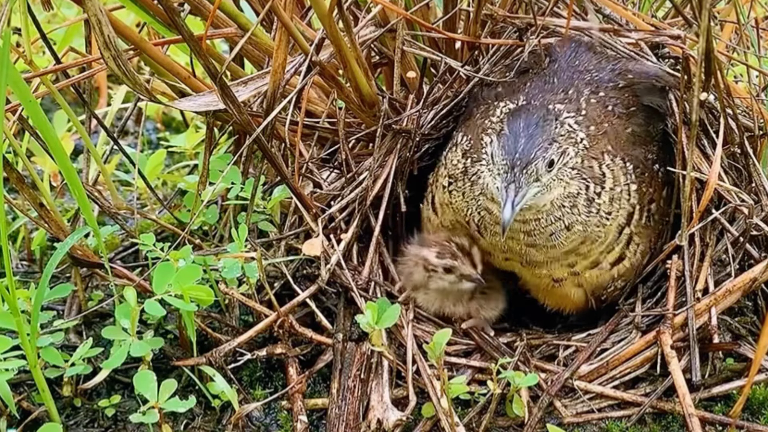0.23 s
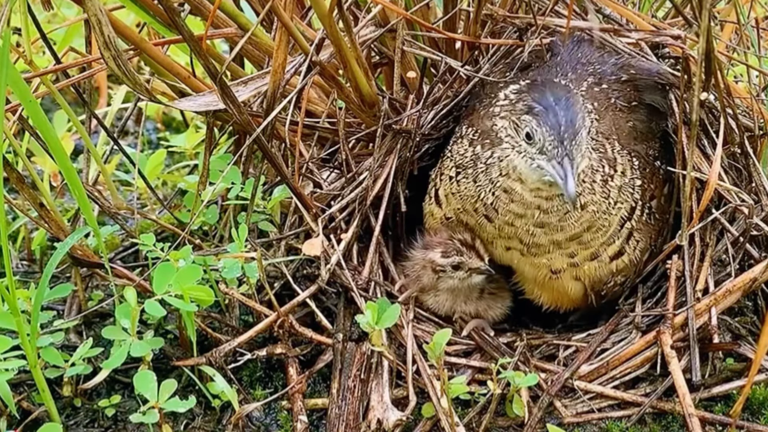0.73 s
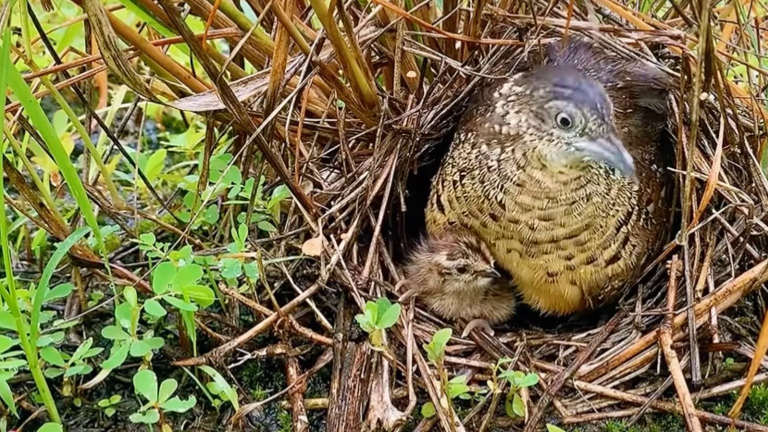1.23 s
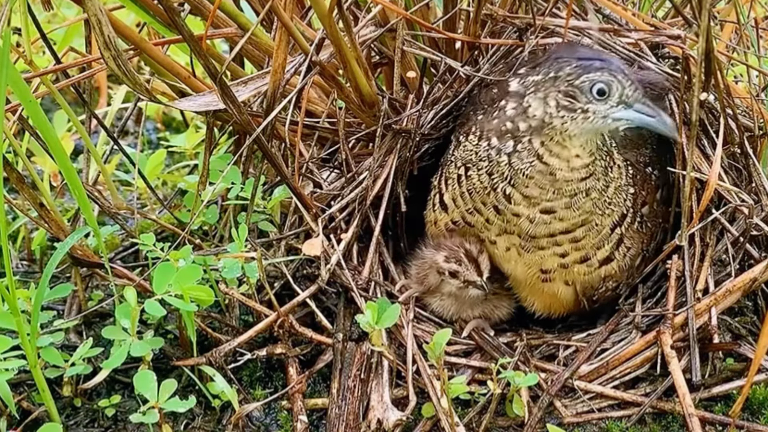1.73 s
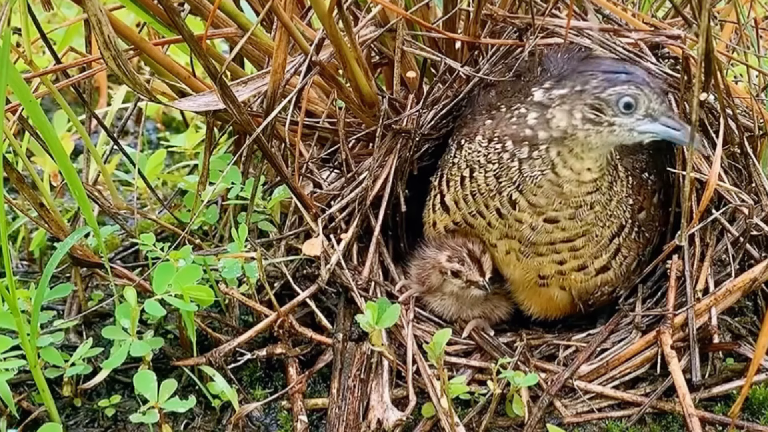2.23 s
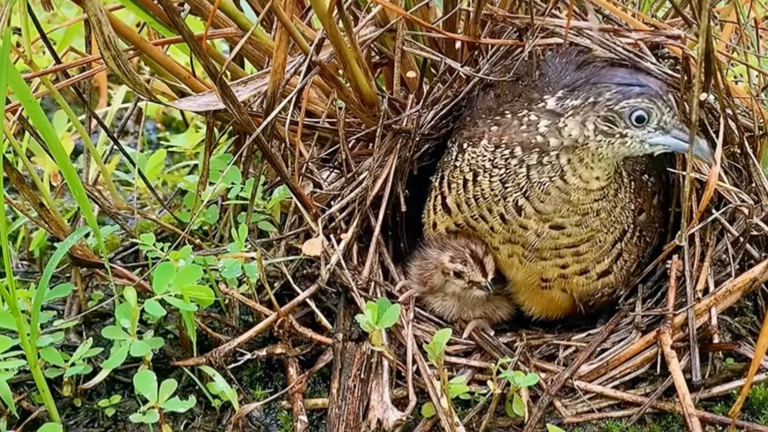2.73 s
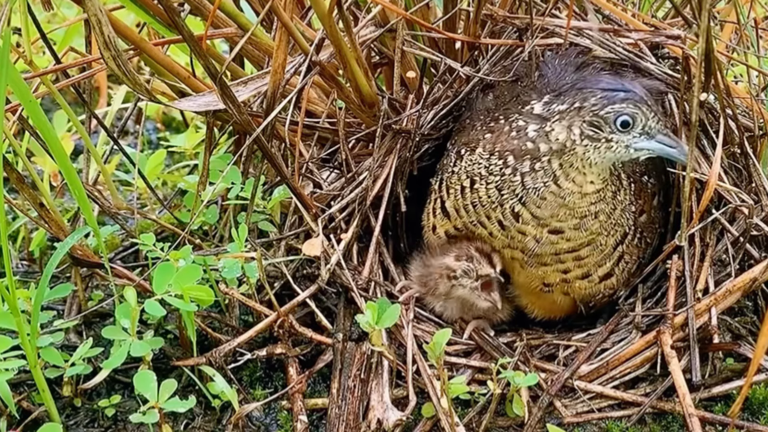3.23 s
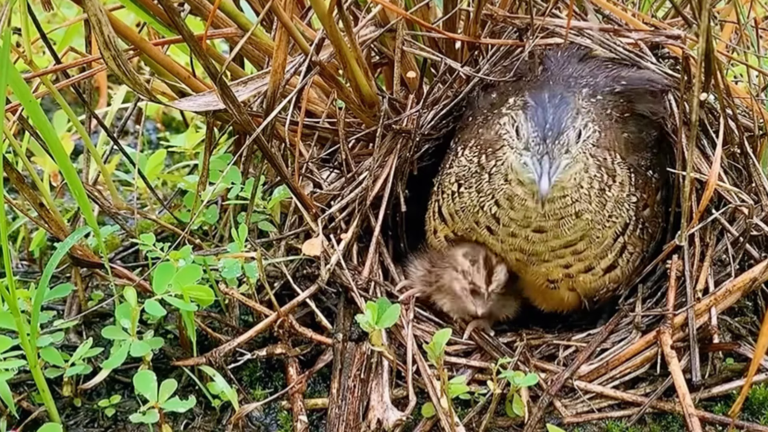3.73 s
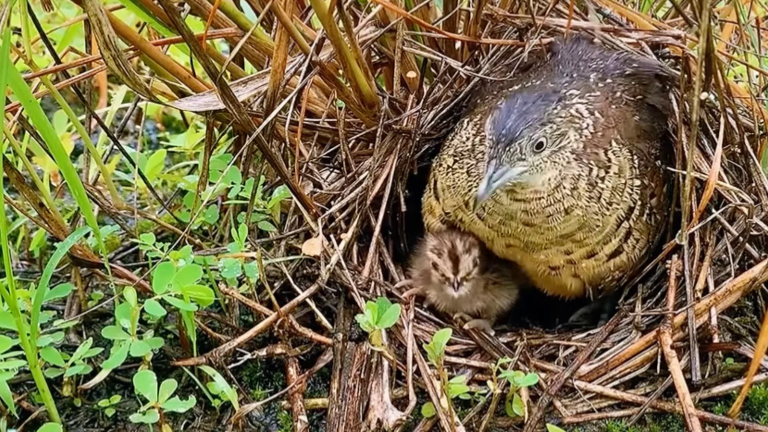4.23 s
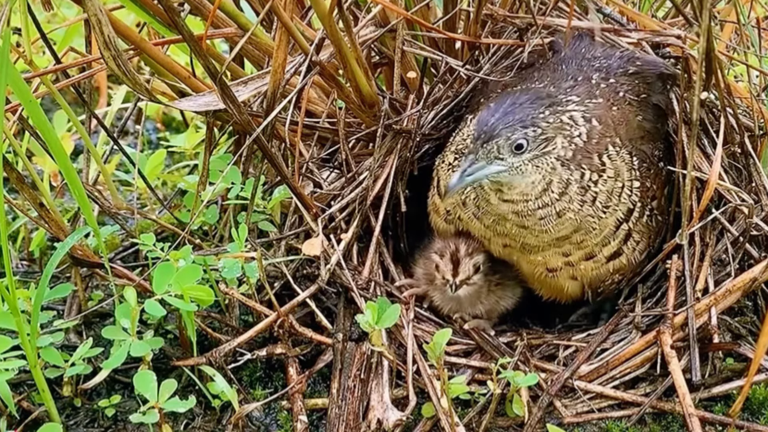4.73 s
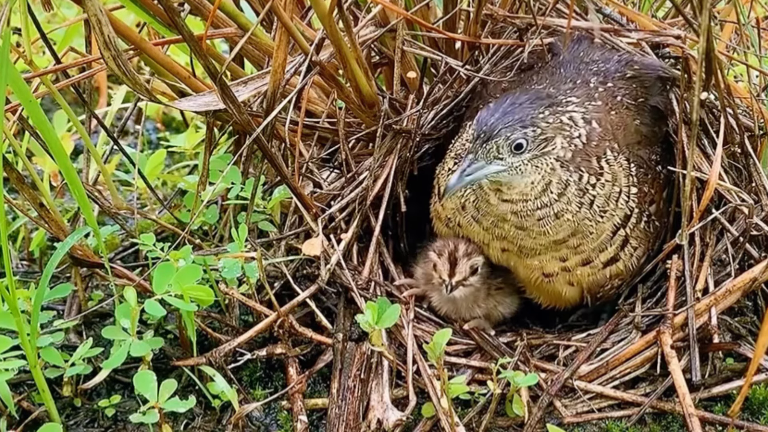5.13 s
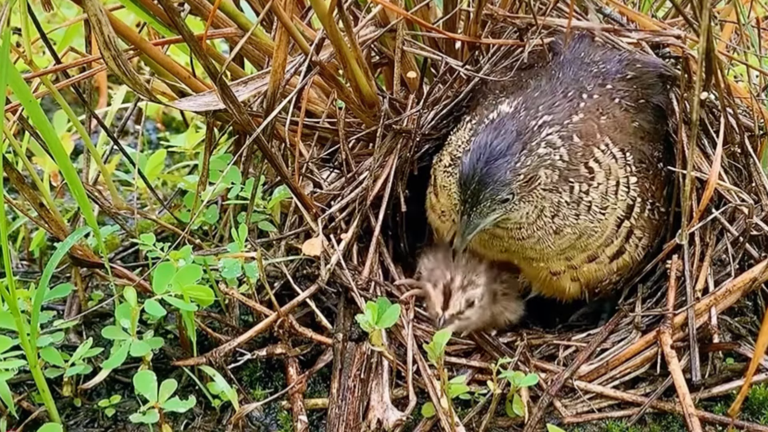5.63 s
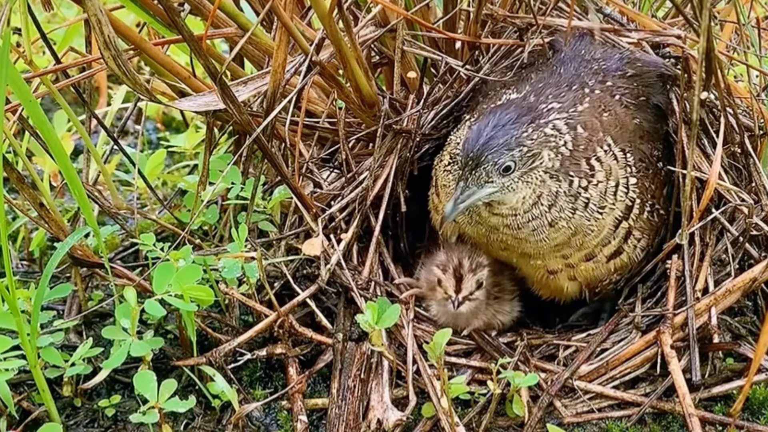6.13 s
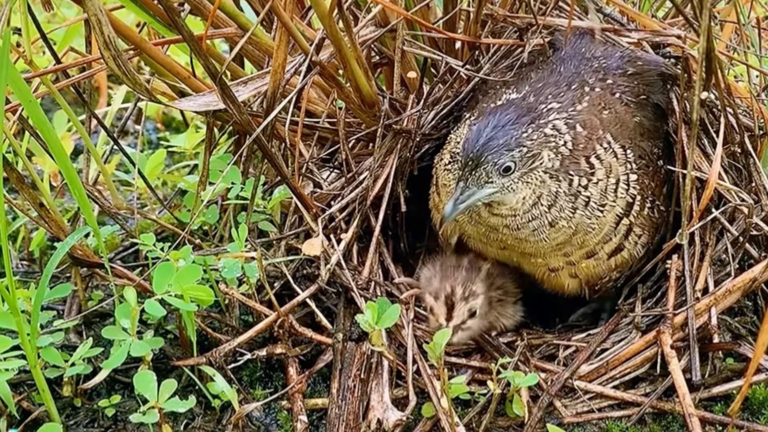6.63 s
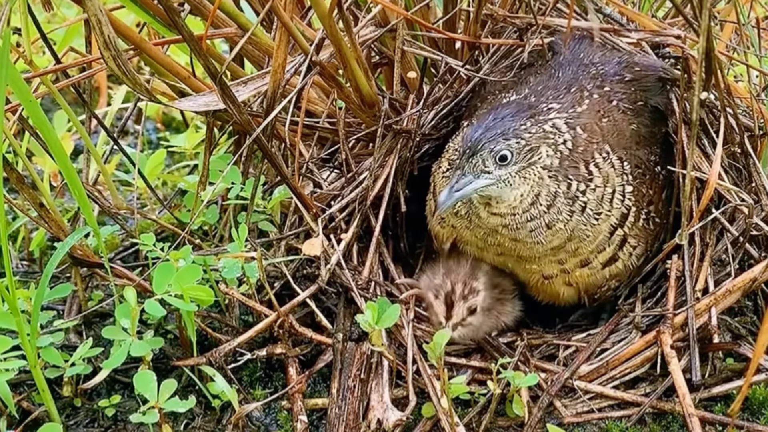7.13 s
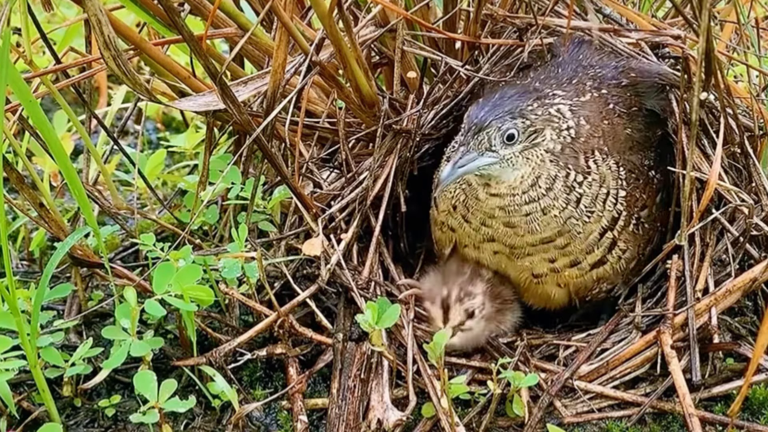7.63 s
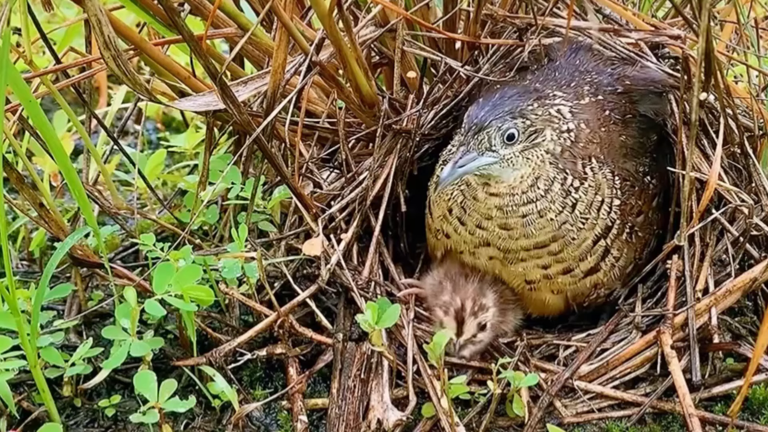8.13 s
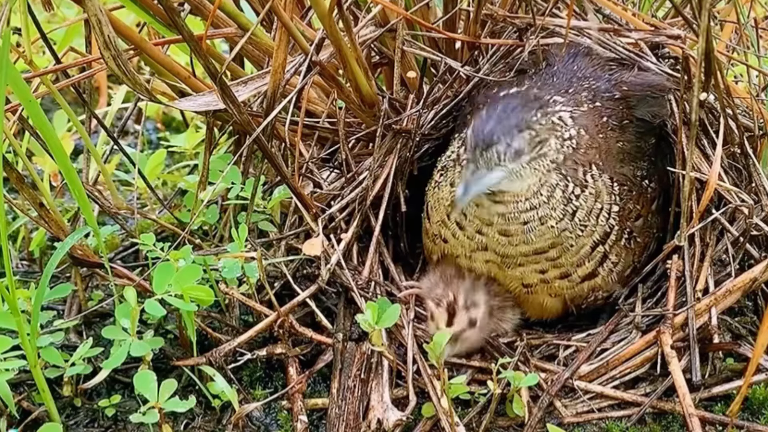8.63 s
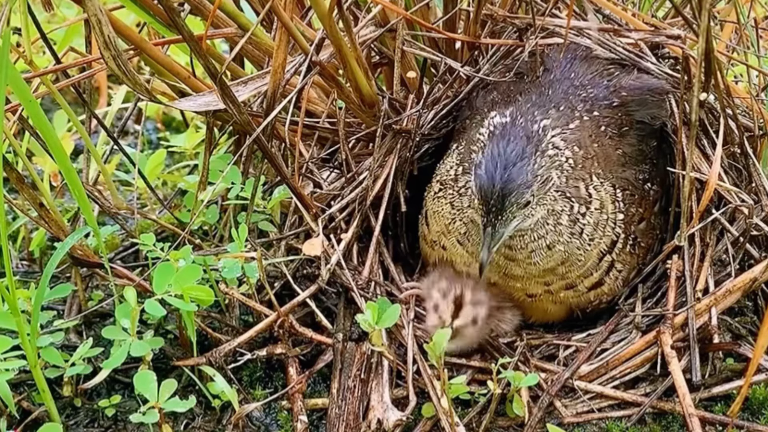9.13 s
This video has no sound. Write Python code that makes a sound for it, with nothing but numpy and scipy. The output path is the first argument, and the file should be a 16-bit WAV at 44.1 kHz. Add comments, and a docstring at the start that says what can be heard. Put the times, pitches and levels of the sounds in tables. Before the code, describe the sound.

A close stereo microphone low in wet grass picks up a dense wash of rain and fine hissing spray. Individual drops stand out: hollow plops, bright snaps on straw, knocks on earth. A far-off motor-like drone with a faint hum wavers, climbs and falters before stopping dead. Afterwards the background is quieter and thinner, while irregular near drops go on to the end.

```python
"""Rain around a ground nest

Steady rain on grass and leaves, heard from close by: filtered noise and impacts make a wash and fine spray.
Near drops are short rings and noise bursts: plops on leaves, ticks and cracks on dry straw, splats, thuds.
A low two-partial rumble, like an engine some way off, runs underneath with a faint hum and thin whines.
The rumble stops abruptly; the wash, spray and small drops are softer from then on."""
import sys
import numpy as np
from scipy import signal
from scipy.fft import rfft, irfft
from scipy.io import wavfile
from scipy.ndimage import uniform_filter1d

SR = 44100
rng = np.random.default_rng(int(sys.argv[2]) if len(sys.argv) > 2 else 0)


def output_pcm(signal):
    """Save a mono or channel-first signal as 16-bit PCM at the path in sys.argv[1].

    Samples are clipped to [-1, 1] before scaling.
    """
    pcm = np.clip(np.atleast_2d(signal).T, -1, 1) * 32767
    wavfile.write(sys.argv[1], SR, np.round(pcm).astype(np.int16))


N = 413658
TIME = np.arange(N) / SR


def undb(db):
    """Decibels to gain."""
    return 10 ** (np.asarray(db) / 20)


def unit(x):
    """Scale to rms 1."""
    return x / np.sqrt(np.mean(x ** 2))


def curve(rows):
    """A (s, value) table, joined by straight lines sample by sample."""
    return np.interp(TIME, *np.transpose(rows))


def per_bin(points):
    """A (Hz, value) table on the frequency bins, joined on a log axis."""
    hz, value = np.transpose(points)
    bin_hz = np.arange(N // 2 + 1) * SR / N
    return np.interp(np.log(bin_hz + 1), np.log(hz), value)


def shape(x, gain):
    """Filter by a gain per frequency bin."""
    return irfft(rfft(x) * gain, N)


def band(x, low_hz, high_hz):
    """Gentle causal band-pass."""
    edges = [low_hz, min(high_hz, SR / 2 - 1000)]
    return signal.sosfilt(signal.butter(2, edges, "band", fs=SR, output="sos"), x)


def walk(rate):
    """Slow random wander of rms 1: rate random values a second, joined smoothly."""
    step = int(SR / rate)
    held = np.repeat(rng.standard_normal(N // step + 1), step)
    return unit(uniform_filter1d(held, step)[:N])


def add(out, s, sound, pan_db=0, lag=0):
    """Mix a sound in at time s, left minus right pan_db; the left side hears it lag seconds later."""
    side_sum = np.cosh(pan_db * np.log(10) / 40)  # keeps the sum of both gains constant
    for side, sign in zip(out, (1, -1)):
        i = int(np.clip((s + sign * lag / 2) * SR, 0, N - 1))
        side[i:i + len(sound)] += sound[:N - i] * undb(sign * pan_db / 2) / side_sum


def ring(hz, cycles, sag, sag_s, rise):
    """A struck surface swells over rise cycles, falls 60 dB in cycles; its pitch sags as the drop spreads."""
    t = TIME[:SR // 10]
    pitch = hz * (1 + sag * (np.exp(-t / sag_s) - 1 / 2))
    swell = undb(-60 * t * hz / cycles) * (1 - np.exp(-t * hz / rise))
    return np.sin(2 * np.pi * np.cumsum(pitch) / SR) * swell / swell.max()


def splash(low_hz, high_hz, decay_s):
    """A short burst of scattered water: decaying noise through a band-pass, peak 1."""
    t = TIME[:SR // 10]
    burst = band(rng.standard_normal(len(t)) * np.exp(-t / decay_s), low_hz, high_hz)
    return burst / np.abs(burst).max()


HUM_HZ = 197.4


def hum(drift, waver_db):
    """A faint hum: one sine whose phase drifts (radians) and whose level wavers."""
    tone = np.sin(2 * np.pi * HUM_HZ * TIME + drift * walk(7))
    return unit(tone * undb(waver_db * walk(8.7)))


# faint thin tones in the treble, level ahead of the shower's strength: pitch_hz, level_db
WHINES = [(2966, -53), (3190, -49.5), (3849, -52), (4350, -55), (4560, -52.5)]


def whines(flutter_per_s):
    """Narrow tones that flutter in level and phase, differently on each side."""
    out = np.zeros((2, N))
    for side in out:
        for hz, db in WHINES:
            phase = 2 * np.pi * hz * TIME
            side += undb(db) * (walk(flutter_per_s) * np.sin(phase) + walk(flutter_per_s) * np.cos(phase))
    return out


# level at idle, and what load adds over a span of pitch above it
IDLE_HZ, IDLE_DB = 54.1, -28
LOAD_SPAN_HZ, LOAD_DB = 1.6, 6
PULL_DB_PER_HZ_PER_S = 0.3155  # added while the pitch climbs
BOOM_HZ, BOOM_WIDTH_HZ = 152, 5.7  # a resonance that the rumble excites
FALTER_DB, FALTER_S = 7, .04  # depth, and time either side of the middle to 1/e of that depth
# speed of the rumble: time_s, pitch_hz
RUMBLE = [(0, 51.5), (0.6, 52.3), (1.15, 56), (1.4, 50.7), (1.7, 52), (2.05, 48.1), (2.45, 50.85),
          (2.75, 50), (3.3, 51.16), (3.8, 53.6), (4.0, 56.36), (4.5, 64.1), (4.85, 66.44), (5.42, 60.8)]
# middles of the moments when the rumble falters: time_s
FALTERS = [.46, 4.36, 4.67, 4.88, 5.24, 5.35]


def rumble(third_db, waver_db):
    """An unsteady drone, louder under load and while speeding up; its third harmonic meets a resonance."""
    hz = curve(RUMBLE)
    load = np.clip((hz - IDLE_HZ) / LOAD_SPAN_HZ, 0, 1)
    speeding_up = uniform_filter1d(np.maximum(np.gradient(hz) * SR, 0), size=SR // 10)
    falter = sum(np.exp(-((TIME - s) / FALTER_S) ** 2) for s in FALTERS)
    db = IDLE_DB + LOAD_DB * load + PULL_DB_PER_HZ_PER_S * speeding_up - FALTER_DB * falter
    phase = 2 * np.pi * np.cumsum(hz) / SR + 0.15 * walk(7.2)
    resonance = 1 / np.hypot(1, (3 * hz - BOOM_HZ) / (BOOM_WIDTH_HZ / 2))
    drone = np.sin(phase) + undb(third_db) * resonance * np.sin(3 * phase)
    return unit(drone) * undb(db + waver_db * walk(19))


def patter(rate, spread_db, smooth):
    """Countless impacts of uneven size; the farthest merge into smooth noise."""
    hit = rng.random(N) < rate / SR
    size = undb(spread_db * np.minimum(rng.exponential(size=N), 4))
    impacts = unit(hit * size * rng.choice([-1, 1], N))
    return unit(impacts + smooth * rng.standard_normal(N))


# tone of the far drops while the rumble runs, and after it: freq_hz, relative_level_db
LOUD_WASH = [(22, -50), (52, 2), (90, -1.5), (130, -2), (260, -5), (430, -8), (850, -12.5), (1400, -14),
             (2000, -19), (4300, -21), (5400, -25), (7000, -22.5), (9000, -63)]
SOFT_WASH = [(22, -50), (50, 2), (130, -4.5), (180, -1), (260, -6.5), (380, -6), (850, -14), (1400, -18.5),
             (2100, -22), (3200, -20.5), (4500, -20), (5400, -27), (7000, -22), (9000, -86)]
# power common to left and right, while the rumble runs and after it: freq_hz, share (0-1)
LOUD_LIKENESS = [(130, 1), (290, 0.98), (640, 0.27), (1400, 0), (2500, 0.08)]
SOFT_LIKENESS = [(130, 0.011), (290, 0.21), (640, 0.39), (1400, 0.096), (2500, 0.07)]
# lean of the wash, left minus right: freq_hz, pan_db
LEAN = [(200, .3), (700, 2), (1500, 2.5), (2600, 2), (4000, -1), (5300, -2.5), (7000, 0)]


def wash(spectrum, likeness, db, flicker_db):
    """Far rain: flickering patter, partly common to both sides, partly each side's own."""
    common, left, right = (patter(rate=900, spread_db=3.0, smooth=1.0) * undb(flicker_db * np.tanh(walk(35)))
                           for _ in range(3))
    share = np.clip(per_bin(likeness), 0, 1)
    both = shape(common, np.sqrt(share)) + shape(np.array([left, right]), np.sqrt(1 - share))
    tone_db = per_bin(spectrum) + np.outer([1, -1], per_bin(LEAN)) / 2
    return undb(db) * unit(shape(both, undb(tone_db)))


def fizz(rate, spread_db, smooth):
    """Droplets burst for a millisecond or two each; the farthest merge into smooth hiss."""
    size = undb(spread_db * np.minimum(rng.exponential(size=N), 5))
    burst = rng.random(N) < rate / SR
    power = np.convolve(burst * size ** 2, np.hanning(SR // 400), "same")
    return unit(rng.standard_normal(N) * np.sqrt(power / power.mean() + abs(smooth)))


# tone of the fine spray on the grass: freq_hz, relative_gain_db
SPRAY = [(3000, -59), (5200, -12), (6500, -3.5), (8500, -1.5), (11000, 4.5), (14000, 2.5), (15300, 2.5)]


def spray(flicker_db):
    """Fine droplets on the grass; the left hears their common part ten samples late with opposite sign."""
    common, left, right = (fizz(rate=270, spread_db=3.0, smooth=1.84) for _ in range(3))
    both = np.array([-np.roll(common, 10), common]) + undb(-11) * np.array([left, right])
    return unit(shape(both, undb(per_bin(SPRAY)))) * undb(flicker_db * walk(60))


def grass_taps(db, spread_db, count):
    """Light drops flick the narrow grass blades: a crackle of short, dry taps, mostly higher than the leaves."""
    out = np.zeros((2, N))
    for when, rank, pitch, place in rng.random((count, 4)):
        hz = 1400 * 3 ** pitch
        tap = splash(hz / 1.6, hz * 1.6, decay_s=.0009)
        tap_db = db - spread_db * np.log(rank + .04)  # a few stand out, most are faint
        add(out, when * N / SR, undb(tap_db) * tap, 16 * (place - .5), lag=.0005 * (place - .5))
    return out


def scattered_drops(db, spread_db, count):
    """Smaller drops on leaves all around."""
    out = np.zeros((2, N))
    for when, rank, pitch, place in rng.random((count, 4)):
        drop = undb(db - spread_db * np.log(rank + .16)) * plop(950 * 2.2 ** pitch)
        add(out, when * N / SR, drop, 2 + 16 * (place - .5), lag=.0005 * (place - .5))
    return out


def small_drops():
    """The patter of lighter drops between the near ones."""
    leaves = scattered_drops(db=-30, spread_db=3.8, count=420)
    return leaves + grass_taps(db=-29, spread_db=3.6, count=500)


def thud(hz):
    """A heavy drip on the ground: a low knock and a dull splash."""
    knock = ring(hz, cycles=23.0, sag=0.16, sag_s=0.0095, rise=0.33)
    return knock + undb(-6.0) * splash(200, 620, decay_s=0.022)


# middle pitch; top level and range below it, ahead of the scene's gains
SOIL_DRIPS_PER_S = 3
SOIL_HZ, SOIL_DB, SOIL_RANGE_DB = 293, -17.5, 12


def ground_drips():
    """Lighter drips on the soil around the nest: thuds up to an octave either side of the middle pitch."""
    out = np.zeros((2, N))
    for when, faintness, pitch in rng.random((int(SOIL_DRIPS_PER_S * N / SR), 3)):
        drip = thud(SOIL_HZ * 2 ** (2 * pitch - 1))
        add(out, when * N / SR, undb(SOIL_DB - SOIL_RANGE_DB * faintness) * drip)
    return out


# heavy drips on the ground: time_s, level_db, pitch_hz
THUDS = [(0.882, -4.5, 380), (1.082, -11, 179), (1.162, -19, 258), (1.449, -14, 128), (2.052, -16, 278),
         (2.185, -10.5, 131), (2.319, -12.5, 472), (2.32, -19, 151), (2.603, -13, 259), (2.649, -16.5, 290),
         (2.186, -18, 253), (3.291, -10.5, 239.4), (3.45, -14, 124.5), (3.53, -21, 112),
         (3.748, -14.5, 289), (4.941, -12.5, 270), (5.385, -13, 129), (5.416, -14, 344), (6.492, -16, 267),
         (6.663, -19.5, 363), (7.773, -15.5, 414), (8.091, -11, 352), (8.832, -14, 364)]


def ground_thuds():
    """Heavy drips knock on the ground straight ahead."""
    out = np.zeros((2, N))
    for s, db, hz in THUDS:
        add(out, s, undb(db) * thud(hz))
    return out


def tick(hz):
    """One drop on a dry stalk: a very short, rough ring and a little fizz."""
    stalk = splash(hz / 1.17, hz * 1.17, decay_s=0.0008)
    return stalk + undb(-11) * splash(1650, 16000, decay_s=0.01)


# drops that make a dry stalk ring: time_s, level_db, pitch_hz, pan_db (left minus right)
TICKS = [(0.409, -11, 13800, 0), (0.9412, -7, 13500, 0), (0.9855, -12, 10400, 0), (2.084, -10, 13300, 2),
         (2.416, -3, 13970, -1), (2.723, -4, 2920, 14), (2.866, -4, 11000, 1), (3.0133, -5, 13700, -2),
         (3.7921, -7, 13000, 0), (5.43, -5, 13900, -1), (7.047, -9, 11000, 2), (7.0963, -7, 13200, -1),
         (8.8263, -6.5, 5000, -7)]


def straw_ticks():
    """Stiff straw answers with a very short ring."""
    out = np.zeros((2, N))
    for s, db, hz, pan_db in TICKS:
        add(out, s, undb(db) * tick(hz), pan_db, lag=rng.normal(0, .0001))
    return out


# drops that shatter on the straw: time_s, level_db
CRACKS = [(0.0588, -5.5), (0.8213, -3), (1.2589, -2), (1.876, -3), (4.2965, -3), (4.626, -2), (5.0963, -4),
          (5.718, -1), (6.009, -5), (6.656, -9), (7.306, -11), (8.363, -8), (8.8568, -7), (8.985, 0.5)]


def straw_cracks():
    """Drops shatter on the straw with a toneless crack of bright noise."""
    out = np.zeros((2, N))
    for s, db in CRACKS:
        add(out, s, undb(db) * splash(4000, 16000, decay_s=.0008), lag=rng.normal(0, .0001))
    return out


def splat(hz):
    """A fat drop bursts: a crack, a fast-falling note as water spreads, a dull slap, a crack of thrown water."""
    delay_s = .002 + 0.003 * rng.random()
    crack = undb(1.5) * splash(800, 4500, decay_s=.0016)
    spread = ring(hz, cycles=10.5, sag=1.0, sag_s=0.0025, rise=0.33)
    slap = undb(-2) * splash(310, 690, decay_s=0.013)
    thrown = undb(-5) * splash(900, 4500, decay_s=0.0014)
    return crack + spread + slap + np.roll(thrown, int(delay_s * SR))


SPLAT_HZ, SPLAT_PAN_DB = 1125, 9  # the wet litter: typical pitch, and place (left minus right)
# fat drops that burst on the litter: time_s, level_db
SPLATS = [(1.283, -15), (1.871, -13), (4.537, -14.5), (4.5911, -15.5), (4.639, -15.5), (4.785, -17.5),
          (4.853, -12), (4.88, -13.5), (4.955, -13.5), (5.377, -17), (5.718, -13.5), (6.011, -17),
          (6.385, -21), (6.492, -11), (6.6588, -12.5), (7.488, -13), (7.7086, -15.5), (7.875, -11.5),
          (8.364, -14.5), (8.827, -17), (8.858, -20)]


def litter_splats():
    """Fat drops burst on the wet litter, each at a slightly different pitch."""
    out = np.zeros((2, N))
    for s, db in SPLATS:
        add(out, s, undb(db) * splat(SPLAT_HZ * 2 ** rng.normal(0, 0.035)), SPLAT_PAN_DB)
    return out


def plop(hz):
    """A drop on a leaf: the blade rings for a few clear cycles, water splashes and the whole leaf gives way."""
    wetness, weight = rng.random(2)
    blade = ring(hz, cycles=11 + 2 * wetness, sag=.3, sag_s=.003, rise=1.6)
    give = ring(hz * (0.351 + 0.34 * weight), cycles=12.0, sag=0.44, sag_s=0.0032, rise=0.89)
    wet = undb(-11) * splash(450, 2200, decay_s=.008)
    return blade + undb(-8) * np.roll(give, int(.0024 * SR)) + wet


# the snap of first contact: its level beside a 0 dB plop, and the dB it gains per dB of plop
SNAP_DB, SNAP_GROWTH = -10.5, .55
LEAF_LAG_S = .00015  # the left side hears a near leaf up to this much later
# drops on the near leaves: time_s, level_db, pitch_hz, pan_db (left minus right)
PLOPS = [(0.0588, -8.0, 2080, 7.0), (0.2039, -5.5, 1360, 0.0), (0.233, -11, 1320.0, -2.0),
         (0.326, -10, 1220, 6), (0.3464, -10, 1310, 0.0), (0.4266, -11, 1210.0, 2), (0.8753, -5, 1250, 2),
         (0.9812, -15, 1340, 2.0), (1.0801, -6.5, 1310, 2.0), (1.1605, -14.5, 1230, 6.0),
         (1.2595, -12.5, 1120, 10), (1.4392, -12.5, 1150, -15), (1.5705, -4.5, 1310, 0.0),
         (1.8775, -11, 1050, 1), (2.0432, -5.5, 1510, 1.0), (2.1744, -16, 1260, -8),
         (2.5968, -6, 1440.0, 1.0), (2.7588, -13.0, 920, 6.0), (2.8136, -8, 1660.0, 2.0),
         (2.8907, -13.0, 1310, 4.0), (2.9412, -14.5, 910, 1.0), (3.1302, -14.5, 1073, 4),
         (3.203, -9, 1760.0, 3.0), (3.4862, -14.5, 930.0, 10), (3.5743, -8, 1280.0, 0.0),
         (3.6555, -13.5, 1216, 6.0), (3.727, -12, 1230, 3.0), (3.8307, -13, 1215, 7.0),
         (3.9554, -5.0, 1360, 1.0), (4.0384, -6.5, 1270, 2.0), (4.0958, -11.5, 1344, 3.0),
         (4.154, -7.5, 1190, -1.0), (4.527, -13, 1110, -2), (4.9093, -12.5, 2090, 12),
         (4.9789, -11, 915, 10), (5.098, -5, 1720, 11.0), (5.1312, -12, 1236, 2.0), (5.3305, -9.5, 1204, 2),
         (5.3996, -11.5, 1300, 2.0), (5.594, -12, 1320.0, 4.0), (5.72, -12, 1110, 7),
         (5.8285, -14.5, 1290, 4.0), (6.0697, -13.5, 1630, 6), (6.1329, -14.5, 1240.0, 3),
         (6.457, -19, 1100.0, 14), (6.501, -10, 1210, 3), (6.609, -18.5, 1140.0, 6),
         (6.8492, -11, 1130, 2.0), (6.984, -14.5, 1080, 4.0), (7.0193, -9, 1150, 5.0),
         (7.259, -15.0, 1140.0, -1.0), (7.3935, -17.5, 1210.0, 4.0), (7.4154, -19, 1050, 13.0),
         (7.6218, -14.5, 1160, 12), (7.7086, -14.5, 1070, -8), (8.0892, -15.5, 1310, 3),
         (8.2742, -10.5, 1500, 5.0), (8.3477, -16.5, 1090, 9.0), (8.5176, -12, 1760.0, 6.0),
         (8.7648, -14.5, 1210.0, 6.0), (8.9858, -11, 960, 7), (9.322, -13.0, 1320, 1)]


def leaf_plops():
    """Drops within reach plop on the leaves, each with a sharp snap of first contact."""
    out = np.zeros((2, N))
    for s, db, hz, pan_db in PLOPS:
        snap = undb(SNAP_DB + SNAP_GROWTH * db) * splash(1740, 5500, decay_s=0.0014)
        add(out, s, undb(db) * plop(hz) + snap, pan_db, lag=LEAF_LAG_S * rng.random())
    return out


DIP_DEPTH_DB = 7.5
# moments when the level dips briefly and recovers: time_s, length_s
DIPS = [(1.285, .12), (1.945, .09), (3.836, .13), (4.301, .17), (8.863, .12), (8.99, .09)]


def dips():
    """Gain that drops at once, lingers and swells back."""
    db = np.zeros(N)
    for s, length in DIPS:
        db -= DIP_DEPTH_DB * (TIME > s) * np.clip(1 - ((TIME - s) / length) ** 2, 0, 1)
    return undb(uniform_filter1d(db, size=128))


STOP_S = 5.432  # the rumble ends
# strength of the wash and the small drops, with hum and whines: time_s, gain_db
SHOWER = [(0, 1.5), (3, 2.5), (4.3, 1.5), (4.55, 3), (5.4, 4), (5.5, 2.5), (8.5, 2.5), (9.38, 4)]


def scene():
    """Rain throughout; the rumble and the louder wash end together. The near drops do not dip."""
    running = np.clip((STOP_S - TIME) / 0.0068 + .5, 0, 1)
    loud = wash(LOUD_WASH, LOUD_LIKENESS, db=-23.0, flicker_db=2.5)
    loud = loud + undb(-32) * hum(drift=0.33, waver_db=3.0)
    soft = wash(SOFT_WASH, SOFT_LIKENESS, db=-26.5, flicker_db=2.5)
    soft = soft + undb(-36.5) * np.array([hum(drift=0.98, waver_db=5.0) for _ in range(2)])
    far = running * loud + (1 - running) * soft
    drops = (small_drops() + ground_drips()) * undb(3 * running)
    rain = (far + drops + whines(flutter_per_s=45)) * undb(curve(SHOWER))
    fine = spray(flicker_db=1.97) * (running * undb(-25) + (1 - running) * undb(-31.5))
    steady = rain + fine + running * rumble(third_db=-2.5, waver_db=-0.5)
    straw = straw_ticks() + straw_cracks()
    return steady * dips() + ground_thuds() + straw + litter_splats() + leaf_plops()


TOP_HZ = 15600


def record(dry):
    """The recorder clips the peaks at full scale, then a steep low-pass cuts the top."""
    low_pass = signal.ellip(10, .2, 80, TOP_HZ, fs=SR, output="sos")
    return signal.sosfilt(low_pass, np.clip(dry, -1, 1))


dry = scene()
out = record(dry)
output_pcm(out)
```